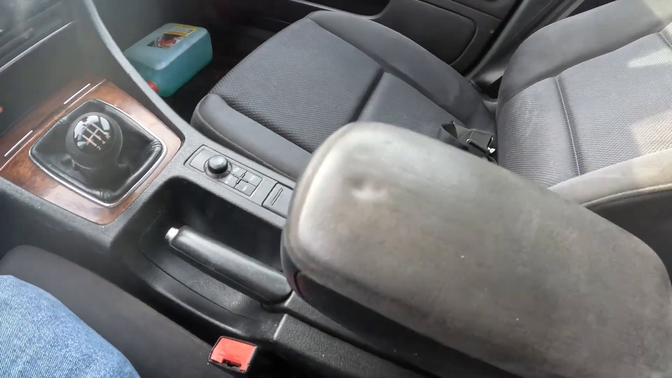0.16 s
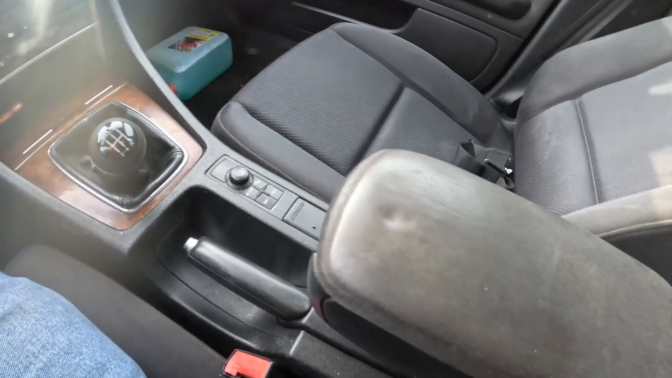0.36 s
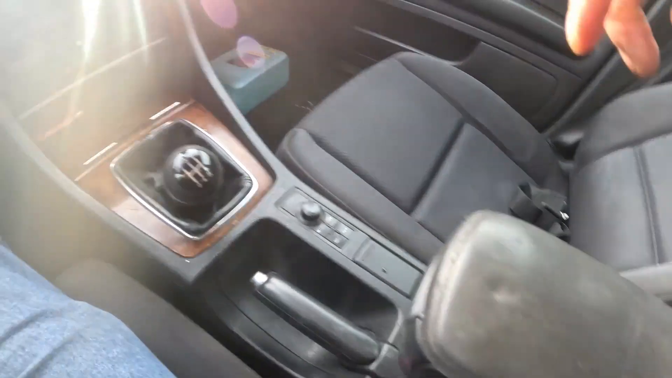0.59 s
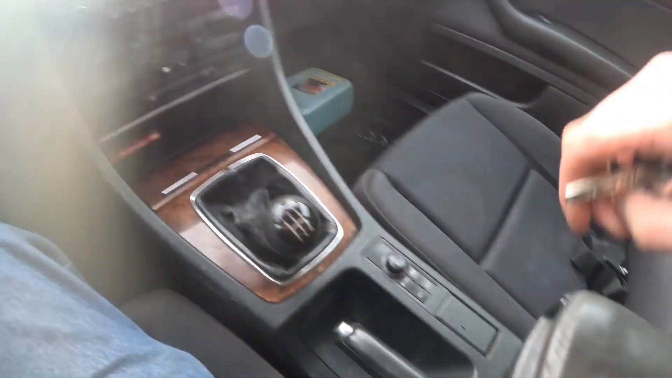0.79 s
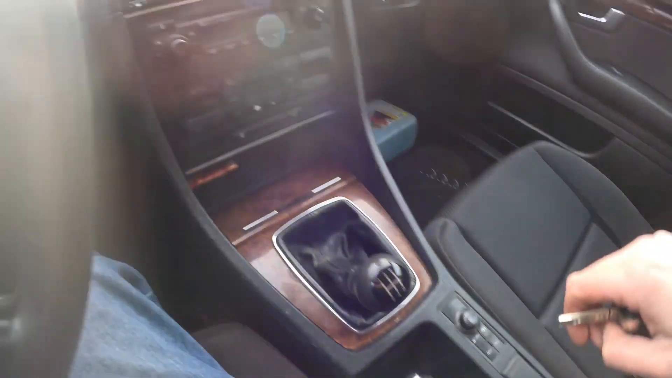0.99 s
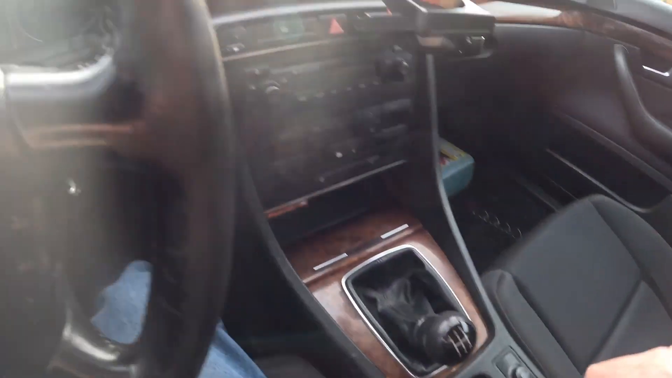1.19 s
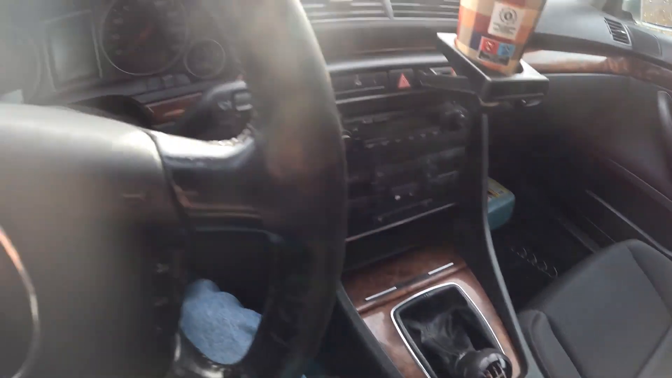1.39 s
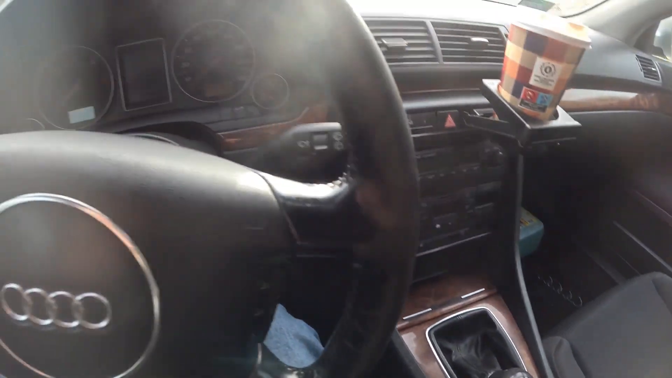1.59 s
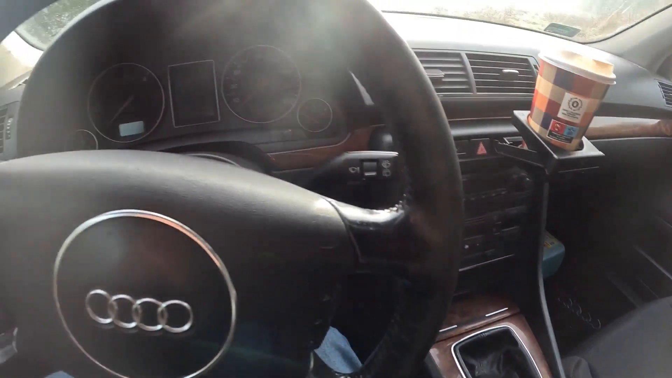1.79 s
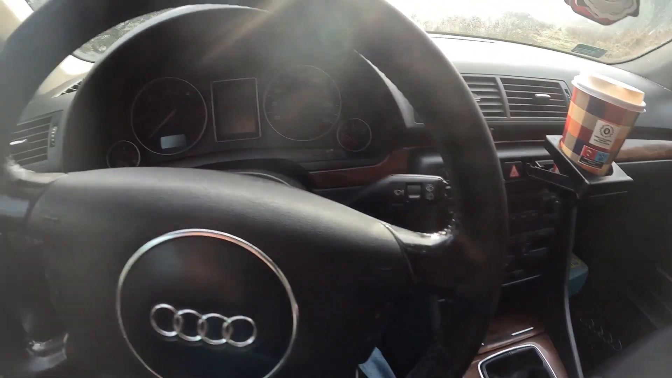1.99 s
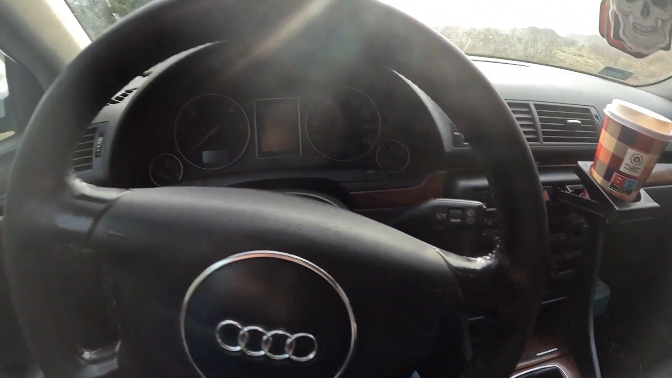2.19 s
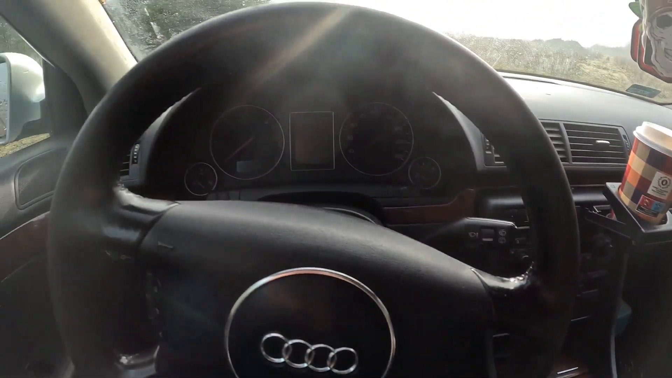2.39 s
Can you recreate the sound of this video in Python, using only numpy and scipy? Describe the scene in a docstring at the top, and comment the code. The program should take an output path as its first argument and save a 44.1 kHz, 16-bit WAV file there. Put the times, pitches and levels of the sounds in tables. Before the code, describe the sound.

Car armrest lid drops with a loud hollow clap, bounces, then quiet cloth rustle and clicks

```python
"""Padded armrest lid falls shut in a parked car: air rushes out, it slams and bounces; blows ring box and lid.
A hand with keys then moves about: trim clicks in a quick run, a late snap, dull knocks and small ticks,
all noise through resonances with decaying envelopes. Cloth rustles as crackling coloured noise.
The cabin rumbles and hisses faintly; a phone with two close microphone ports listens."""
import sys
import numpy as np
from scipy import signal
from scipy.fft import rfft, irfft
from scipy.io import wavfile
from scipy.ndimage import uniform_filter1d

SR = 44100
rng = np.random.default_rng(int(sys.argv[2]) if len(sys.argv) > 2 else 0)


def ratio(d):
    """dB to gain"""
    e = np.asarray(d, float) / 20
    return 10 ** e


def generate_wav(signal):
    """Clip the signal to [-1, 1] and save it as 16-bit WAV at the path in sys.argv[1]."""
    frames = np.transpose(np.atleast_2d(signal))
    scaled = np.clip(frames, -1, 1) * 32767
    pcm = np.round(scaled).astype(np.int16)
    wavfile.write(sys.argv[1], SR, pcm)


N = 105840

# lid blows (time [s], boom [dB], box [dB], lid [dB], crack [dB], contact [ms])
LID_BLOWS = [(0.1887, -50.5, -35.5, -33.5, -44.5, 0.71), (0.1990, -42.5, -25.5, -23.5, -37.5, 1.9),
             (0.2096, -24, -3, -17.5, -3, 0.33), (.2900, -29.5, -35, -15, -30, 0.63),
             (0.331, -26, -37, -22, -44.5, 1.1), (0.3448, -33.5, -44, -38, -47, 0.92)]
# cabin boom modes (frequency [Hz], level [dB], T60 [s])
BOOM_MODES = [(44.7, -2.5, 0.35), (56, -5, .2), (75.2, -3, 0.19)]
# hollow box under the lid (frequency [Hz], level [dB], T60 [s])
BOX_MODES = [(216, 1.5, 0.078), (387.6, -9, 0.044), (516, -11, .025), (710.6, -6.5, 0.018),
             (898.4, -13.5, 0.016), (1081, -1.5, 0.025), (1570, -15, 0.027)]
# padded lid (frequency [Hz], level [dB], T60 [s])
LID_MODES = [(260, 0, 0.052), (425, -27.5, 0.053), (632, -15.5, 0.045), (780, -6, 0.03), (936, -7, 0.032),
             (1083, -8.5, 0.029)]
# crack spectrum (frequency [Hz], density [dB per Hz])
CRACK_COLOUR = [(400, -18), (900, 5), (1700, -9.5), (2200, -21.5), (3200, -8), (4600, -21.5), (7800, -25),
                (15500, -49.5)]
# air squeezed out under the falling lid (time [s], level [dB])
RUSH_LEVEL = [(.14, -73), (.178, -46), (.197, -27.5), (.2095, -17)]
# its spectrum (frequency [Hz], density [dB per Hz])
RUSH_SPECTRUM = [(60, -19), (250, 6), (550, -11), (930, -8), (5200, -38), (12000, -63), (16000, -90.5)]
# loose parts (frequency [Hz], density [dB per Hz])
RATTLE_SPECTRUM = [(60, -20.5), (210, 4.5), (430, -6.5), (600, -13), (1400, -20.5), (4000, -38),
                   (9000, -58.5), (14000, -87)]
# armrest at the ports, left lead (frequency [Hz], phase [rad])
ARMREST_PHASE = [(100, -.06), (250, -.08), (500, -.3), (1000, -.4), (2000, -.9), (2500, .6), (3600, -.9),
                 (9000, .6)]
# armrest at the ports (frequency [Hz], left minus right [dB])
ARMREST_BALANCE = [(60, -.7), (250, -1.2), (500, -2.3), (1300, -1.6), (2400, 2.4), (4400, 1), (8000, 3.3),
                   (15000, 0)]
# trim clicks (time [s], bright part [dB], body [dB], left minus right [dB])
TRIM_CLICKS = [(1.2735, -40, -52.5, 2), (1.2892, -45, -51, -3), (1.311, -40.5, -45.5, 2.5),
               (1.3348, -46, -51, 4), (1.3519, -47, -53.5, -8), (1.3731, -44, -48.5, 4.5),
               (1.4001, -42.5, -50.5, 0.5), (1.5139, -42, -51.5, 1)]
# bright click resonances (frequency [Hz], width [Hz], level [dB])
CLICK_BRIGHT_PEAKS = [(2500, 180, -5.5), (3413, 640, 4), (4780, 570, -4), (5500, 69, 1.5),
                      (6190, 880, -6.5), (7400, 460, -7.5), (8690, 970, -14)]
# click body resonances (frequency [Hz], width [Hz], level [dB])
CLICK_BODY_PEAKS = [(260, 90, -6), (430, 140, -3), (780, 170, 0), (1300, 260, -2)]
# last snap (time [s], level [dB], left minus right [dB])
LAST_SNAP = [(2.264, -42, 2.5)]
# snap resonances (frequency [Hz], width [Hz], level [dB])
SNAP_PEAKS = [(585, 320, 0.5), (1080, 325, -5.5), (1760, 300, -3.5), (3220, 1040, -2), (5100, 1400, -7.5),
              (6330, 226, 1.5), (8070, 2000, -9)]
# hollow ring of the snap (frequency [Hz], level [dB], T60 [s])
SNAP_MODES = [(680, -47, .045), (1050, -52, .055)]
# knocks on the trim (time [s], low resonance [dB], middle [dB], high [dB])
TRIM_KNOCKS = [(.255, -36, -41, -51), (.777, -62.5, -79, -59), (1.037, -58.5, -63, -64),
               (1.07, -70, -81, -77), (1.093, -68, -58.5, -60), (1.613, -54, -57, -55),
               (1.661, -71.5, -54.5, -59), (1.713, -51.5, -67, -52), (1.734, -77, -56.5, -68)]
# knock resonances, low to high (frequency [Hz], width [Hz])
KNOCK_PEAKS = [(400, 260), (880, 150), (1380, 320)]
# small ticks (time [s], level [dB], centre [Hz], width [Hz])
SMALL_TICKS = [(.020, -59.5, 5500, 4770), (.1085, -49.5, 3430, 4500), (.777, -61.5, 5640, 3927),
               (1.038, -59.5, 3430, 3028), (1.068, -53.5, 7410, 8000), (1.095, -56.5, 6030, 3100),
               (1.663, -54, 3550, 6960), (1.901, -61.5, 9510, 4920), (1.97, -58.5, 3950, 2950)]
# cloth rubbing (time [s], level [dB])
CLOTH_ENVELOPE = [(0, -79), (.1, -63.5), (.3, -77), (.75, -71.5), (1.05, -70), (1.25, -60), (1.4, -61),
                  (1.47, -67.5), (1.6, -71.5), (1.72, -61.5), (1.9, -59), (1.945, -71.5), (2.4, -99)]
# cloth spectrum (frequency [Hz], density [dB per Hz])
CLOTH_COLOUR = [(800, -23.5), (1400, 1), (2000, -2.5), (2600, -5), (3100, -2), (3600, -1.5), (4200, -9.5),
                (5100, -5.5), (7500, -13), (12000, -27), (16000, -55)]
# low rustle of seat and clothes (time [s], level [dB])
LOW_RUSTLE_ENVELOPE = [(0, -64), (.12, -66), (.45, -73), (.66, -77.5), (.8, -67), (1.1, -62.5), (1.22, -69),
                       (1.32, -63), (1.47, -70), (1.75, -66.5), (2.0, -73.5), (2.4, -73)]
# its spectrum (frequency [Hz], density [dB per Hz])
LOW_RUSTLE_COLOUR = [(70, -27), (120, 2), (300, -2.5), (700, -10.5), (1200, -39)]
# rumble of the held phone and the cabin (time [s], level [dB])
RUMBLE_ENVELOPE = [(0, -59), (.3, -53.5), (.55, -50), (.68, -58.5), (.82, -57), (1.0, -55.5), (1.15, -52.5),
                   (1.21, -56), (1.3, -47), (1.42, -54.5), (1.49, -69.5), (1.57, -58), (1.78, -55.5),
                   (1.95, -61), (2.05, -61), (2.22, -60.5), (2.33, -59.5), (2.4, -62.5)]
# its spectrum (frequency [Hz], density [dB per Hz])
RUMBLE_COLOUR = [(10, -19), (20, 6.5), (50, 0.5), (85, -14), (140, -15), (250, -59.5)]
# distant hiss (frequency [Hz], density [dB per Hz])
HISS_COLOUR = [(600, -29.5), (1050, 3), (1400, 3), (2300, -9.5), (5000, -9.5), (7700, -10.5),
               (12000, -23.5), (16000, -47)]
# flicker scale of rumble, low rustle, cloth, hiss [dB per unit of walk()]
FLICKER_DB_PER_UNIT = (2.2, 4, 2, 1.1)
# cabin at the ports, left lead (frequency [Hz], phase [rad])
PORT_PHASE = [(100, 0.26), (600, 0.54), (1800, -0.73), (6000, -0.44)]
# cabin at the ports (frequency [Hz], left minus right [dB])
PORT_BALANCE = [(60, 0.43), (300, -1.5), (1000, 1.4), (8000, 1.5)]
# correlation of the ports (frequency [Hz], likeness [0-1])
PORT_ALIKE = [(60, 0.94), (300, 0.92), (1000, 0.85), (5000, 0.64), (15000, 0.12)]

INWARD_HZ = 320  # modes below this swing inward first
LID_SWELL_S = 0.0024  # padding lets the lid swing up gently
CRACK_TOP_HZ_TIMES_MS = 8000  # longer contact cracks duller: top Hz = this / contact ms
CRACK_T60_PER_CONTACT = 36  # and longer
CRACK_TAIL_DB, CRACK_TAIL_T60_S = -16, 0.06  # against the crack
CRACK_SIDE_DB = -18  # reflections that differ left and right, against the crack
RATTLE_DB, RATTLE_T60_S = -13.5, 0.11  # against the lid level of each blow
RATTLE_GRAIN_DB_PER_UNIT = 2.5  # scales walk()
WHISTLE_HZ, WHISTLE_WIDTH_HZ, WHISTLE_DB = 7900, 480, -30.5  # against the rush
CREAK_S, CREAK_LENGTH_S, CREAK_HZ, CREAK_DB = 0.0077, 0.097, 527, -60  # hinge of the falling lid
CLICK_T60_S, CLICK_BODY_T60_S, CLICK_HISS_DB = 0.047, 0.078, -12
SNAP_T60_S, TICK_T60_S = 0.065, 0.03
KNOCK_T60_S, KNOCK_ATTACK_S = 0.09, 0.006
RESONANCE_TOP_HZ = 11700  # resonant noise rolls off above
CRACKLE_PER_S, CRACKLE_SHARE = 900, 0.1  # share of the cloth power
FLICKER_PER_S, HISS_DB = 16, -71.5
CLIP_DB, BAND_HZ = -0.4, 15000


def over_hz(table):
    """(Hz, value) table read at every FFT bin, on a log frequency axis."""
    hz, value = np.array(table, float).T
    bins_hz = np.fft.rfftfreq(N, 1 / SR)
    return np.interp(np.log(bins_hz + 1), np.log(hz), value)


def unit(x):
    """Scale to rms 1."""
    return x / np.sqrt(np.mean(x ** 2))


def noise(colour):
    """Noise of rms 1 with a (Hz, dB) spectrum."""
    white = rfft(rng.standard_normal(N))
    return unit(irfft(white * ratio(over_hz(colour)), N))


def resonant(peaks, steep=1.5):
    """Noise of rms 1 through (Hz, width Hz, dB) resonances; steep sharpens their skirts."""
    f = np.fft.rfftfreq(N, 1 / SR) + 1
    power = 0
    for hz, width_hz, db in peaks:
        detune = (f - hz * hz / f) / width_hz
        power = power + ratio(db) ** 2 / (1 + detune ** 2) ** steep
    power = power / (1 + (f / RESONANCE_TOP_HZ) ** 10)
    return unit(irfft(rfft(rng.standard_normal(N)) * np.sqrt(power), N))


def fade(at_s, t60_s, attack_s=0.00067):
    """Linear attack times exponential decay."""
    t = np.arange(N) / SR - at_s
    return np.clip(t / attack_s, 0, 1) * ratio(-60 * np.clip(t, 0, 3) / t60_s)


def curve(table):
    """Gain over time from (s, dB), -120 dB outside the table."""
    time_s, db = np.array(table, float).T
    return ratio(np.interp(np.arange(N) / SR, time_s, db, left=-120, right=-120))


def walk(rate_per_s):
    """Random values held 1 / rate s, smoothed twice and scaled down."""
    hold = int(SR / rate_per_s)
    steps = np.repeat(rng.standard_normal(N // hold + 1), hold)
    return 0.36 * uniform_filter1d(uniform_filter1d(steps, hold), hold)[:N]


def ports(x, phase, balance):
    """One sound at the two ports: phase and level differences split evenly between them."""
    half = ratio(over_hz(balance) / 2) * np.exp(1j * over_hz(phase) / 2)
    spectrum = rfft(x)
    return np.array([irfft(spectrum * half, N), irfft(spectrum / half, N)])


def pan(lr_db):
    """Left and right gains lr_db apart."""
    return ratio(np.array([[lr_db / 2], [-lr_db / 2]]))


def ring(modes, swell_s=1e-5):
    """Impulse response of a body: a sum of decaying sine modes."""
    t = np.arange(SR // 2) / SR
    out = np.zeros(len(t))
    for hz, db, t60_s in modes:
        out += np.sign(hz - INWARD_HZ) * ratio(db - 60 * t / t60_s) * np.sin(2 * np.pi * hz * t)
    return (1 - np.exp(-t / swell_s)) * out


def air_rush():
    """Air squeezed out under the lid: swelling coloured noise with a narrow whistle."""
    whistle = resonant([(WHISTLE_HZ, WHISTLE_WIDTH_HZ, 0)])
    return curve(RUSH_LEVEL) * (noise(RUSH_SPECTRUM) + ratio(WHISTLE_DB) * whistle)


def hinge_creak():
    """Hinge of the falling lid: narrow noise under a half-sine envelope."""
    progress = np.clip((np.arange(N) / SR - CREAK_S) / CREAK_LENGTH_S, 0, 1)
    return ratio(CREAK_DB) * resonant([(CREAK_HZ, 90, 0)]) * np.sin(np.pi * progress)


def armrest():
    """Each blow's contact pulse drives boom, box and lid modes; it cracks, and loose parts rattle after."""
    t, mid, side = np.arange(N) / SR, np.zeros(N), np.zeros(N)
    crack = np.array([noise(CRACK_COLOUR), ratio(CRACK_SIDE_DB) * noise(CRACK_COLOUR)])
    rattle = noise(RATTLE_SPECTRUM) * ratio(RATTLE_GRAIN_DB_PER_UNIT * walk(300))
    boom, box, lid = ring(BOOM_MODES), ring(BOX_MODES), ring(LID_MODES, LID_SWELL_S)
    for at_s, boom_db, box_db, lid_db, crack_db, contact_ms in LID_BLOWS:
        contact_s = contact_ms / 1000
        push = np.sin(np.pi * np.clip((t - at_s) / contact_s, 0, 1)) ** 2
        # minus: the boom swings outward first
        body = -ratio(boom_db) * boom + ratio(box_db) * box + ratio(lid_db) * lid
        mid += signal.fftconvolve(push / push.sum(), body)[:N]
        top_hz = min(CRACK_TOP_HZ_TIMES_MS / contact_ms, 0.45 * SR)
        dull = signal.lfilter(*signal.butter(2, top_hz, fs=SR), crack)
        decay = fade(at_s, CRACK_T60_PER_CONTACT * contact_s)
        decay = decay + ratio(CRACK_TAIL_DB) * fade(at_s, CRACK_TAIL_T60_S)
        crack_mid, crack_side = ratio(crack_db) * dull * decay
        mid += crack_mid + ratio(lid_db + RATTLE_DB) * rattle * fade(at_s, RATTLE_T60_S)
        side += crack_side
    mid += air_rush() + hinge_creak()
    return ports(mid, ARMREST_PHASE, ARMREST_BALANCE) + side * np.array([[1], [-1]])


def clicks():
    """Trim clicks: bright and body resonances, each with its own decay."""
    bright = resonant(CLICK_BRIGHT_PEAKS) + ratio(CLICK_HISS_DB) * noise(CLOTH_COLOUR)
    bright = ports(bright, PORT_PHASE, [(1, 0)])
    body = ports(resonant(CLICK_BODY_PEAKS), PORT_PHASE, [(1, 0)])
    out = np.zeros((2, N))
    for at_s, bright_db, body_db, lr_db in TRIM_CLICKS:
        click = ratio(bright_db) * bright * fade(at_s, CLICK_T60_S)
        click = click + ratio(body_db) * body * fade(at_s, CLICK_BODY_T60_S)
        out += pan(lr_db) * click
    return out


def last_snap():
    """Snap: a burst of resonant noise plus a hollow two-mode ring."""
    (at_s, db, lr_db), = LAST_SNAP
    snap = ratio(db) * resonant(SNAP_PEAKS) * fade(at_s, SNAP_T60_S, 0.0009)
    start = int(at_s * SR)
    snap[start:] += ring(SNAP_MODES, 0.001)[:N - start]
    return pan(lr_db) * ports(snap, PORT_PHASE, [(1, 0)])


def knocks():
    """Dull knocks: each stirs three trim resonances in its own shares."""
    rings = [resonant([(hz, width_hz, 0)], 2) for hz, width_hz in KNOCK_PEAKS]
    out = np.zeros(N)
    for at_s, *levels_db in TRIM_KNOCKS:
        envelope = fade(at_s, KNOCK_T60_S, KNOCK_ATTACK_S)
        for db, resonance in zip(levels_db, rings):
            out += ratio(db) * resonance * envelope
    return ports(out, PORT_PHASE, PORT_BALANCE)


def ticks():
    """Small ticks: short noise bursts, one broad resonance each."""
    out = np.zeros(N)
    for at_s, db, hz, width_hz in SMALL_TICKS:
        out += ratio(db) * resonant([(hz, width_hz, 0)], 2.6) * fade(at_s, TICK_T60_S, 0.00064)
    return ports(out, PORT_PHASE, PORT_BALANCE)


def cloth_crackle():
    """Fine grain of rubbing cloth: smoothed random impulses over a constant share of the power."""
    impulses = (rng.random(N) < CRACKLE_PER_S / SR) * rng.exponential(size=N) ** 2
    impulses = impulses * SR / CRACKLE_PER_S / 2  # mean 1
    power = 1 - CRACKLE_SHARE + CRACKLE_SHARE * uniform_filter1d(impulses, size=60).clip(0)
    return np.sqrt(power)


def cabin():
    """Rumble, low rustle, cloth and hiss as flickering noise; the ports agree most in the bass."""
    alike = np.clip(over_hz(PORT_ALIKE), 0, 1)
    layers = [(curve(RUMBLE_ENVELOPE), RUMBLE_COLOUR),
              (curve(LOW_RUSTLE_ENVELOPE), LOW_RUSTLE_COLOUR),
              (curve(CLOTH_ENVELOPE) * cloth_crackle(), CLOTH_COLOUR),
              (ratio(HISS_DB), HISS_COLOUR)]
    out = np.zeros((2, N))
    for (level, colour), flicker_db in zip(layers, FLICKER_DB_PER_UNIT):
        gain = level * ratio(flicker_db * walk(FLICKER_PER_S))
        mid, side = rfft(gain * noise(colour)), rfft(gain * noise(colour))
        shared = irfft(mid * np.sqrt((1 + alike) / 2), N)
        opposed = irfft(side * np.sqrt((1 - alike) / 2), N)
        out += ports(shared, PORT_PHASE, PORT_BALANCE) + opposed * np.array([[1], [-1]])
    return out


def scene():
    """Sum of all sources at the two ports."""
    return armrest() + clicks() + last_snap() + knocks() + ticks() + cabin()


def roll_off(x):
    """The treble ends steeply here."""
    return signal.sosfilt(signal.butter(12, 16470, fs=SR, output="sos"), x)


def record(dry):
    """Hard-clip the peaks, then low-pass steeply."""
    clipped = np.clip(dry, -ratio(CLIP_DB), ratio(CLIP_DB))
    low_pass = signal.ellip(6, 0.2, 60, BAND_HZ, fs=SR, output="sos")
    mix = signal.sosfilt(low_pass, clipped)
    return roll_off(mix)


dry = scene()
out = record(dry)
generate_wav(out)
```